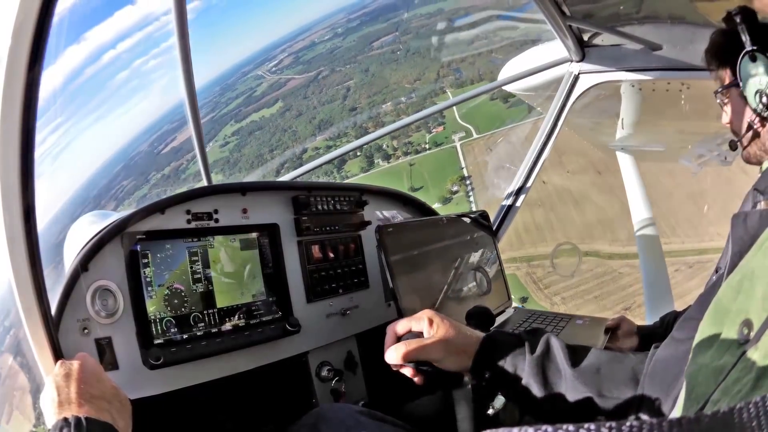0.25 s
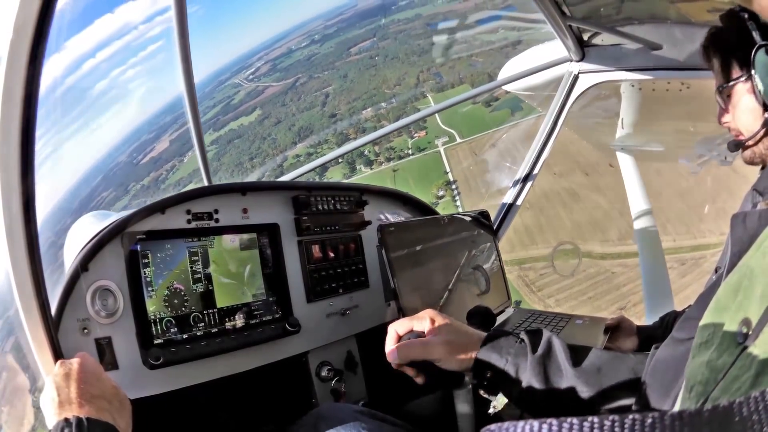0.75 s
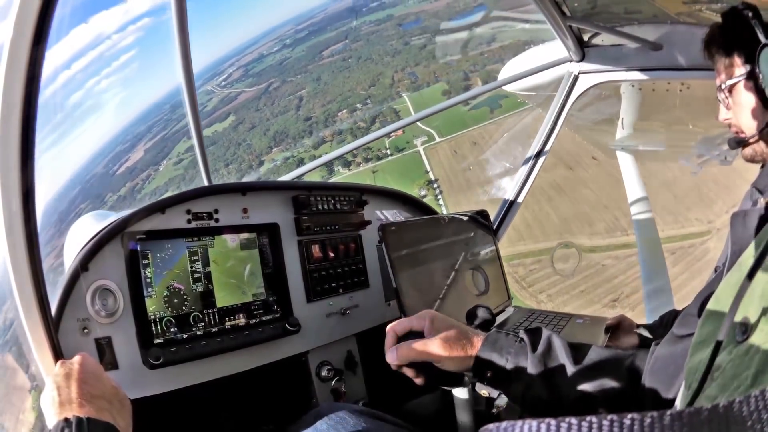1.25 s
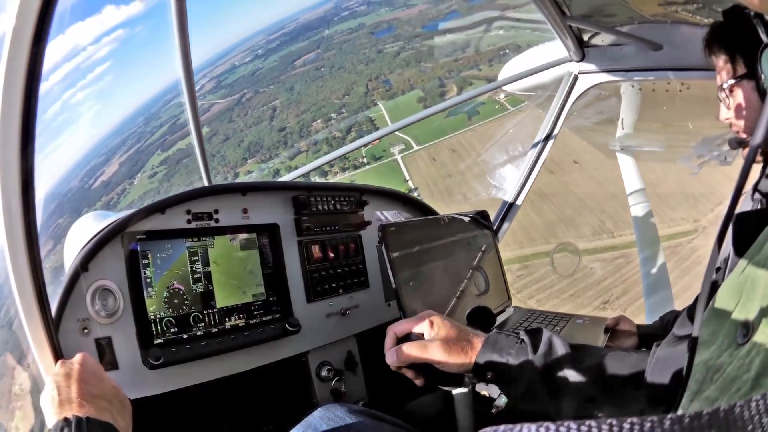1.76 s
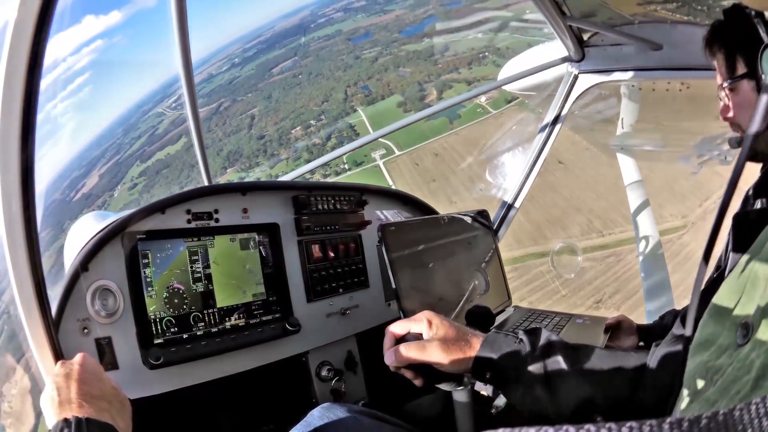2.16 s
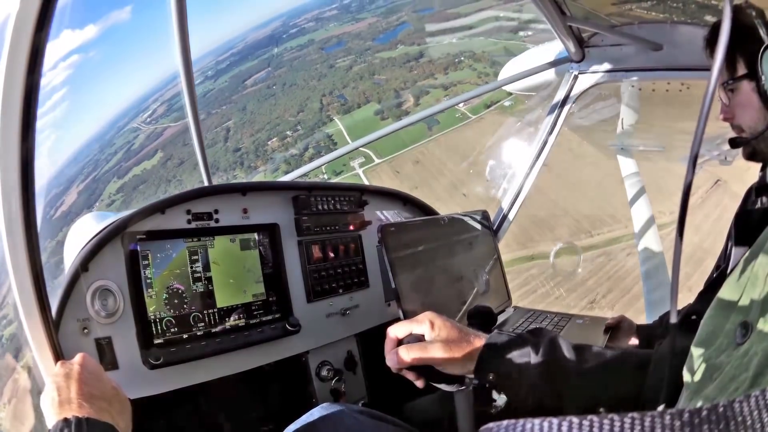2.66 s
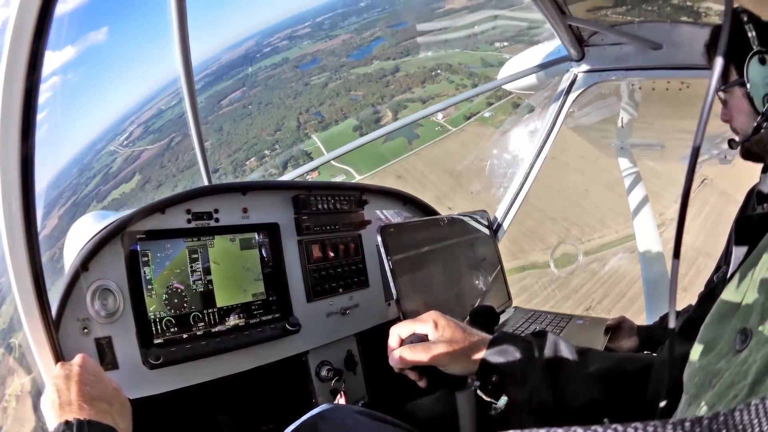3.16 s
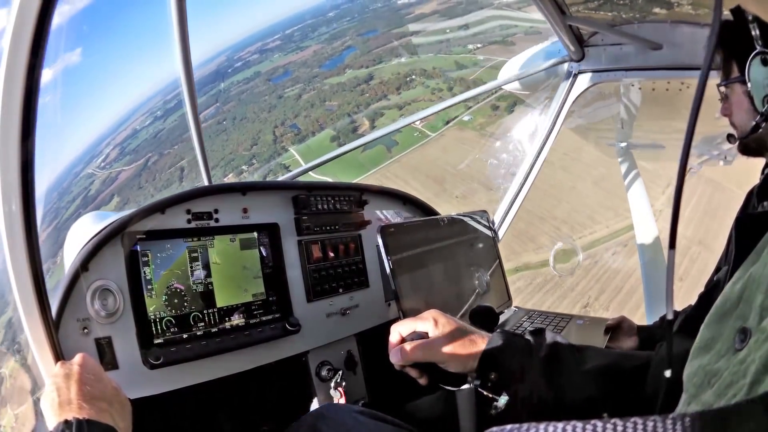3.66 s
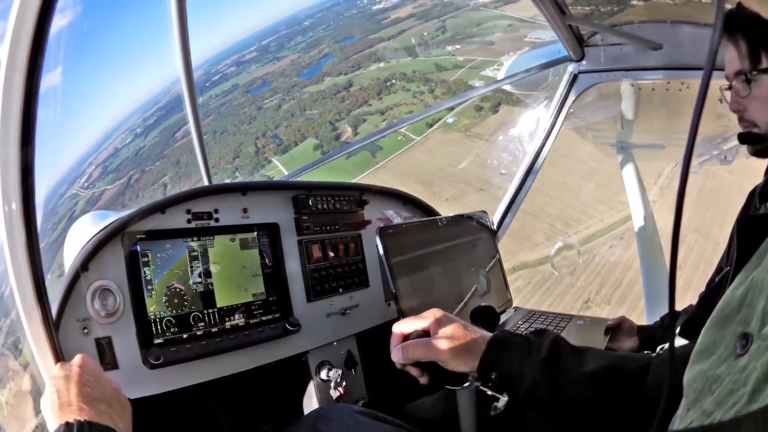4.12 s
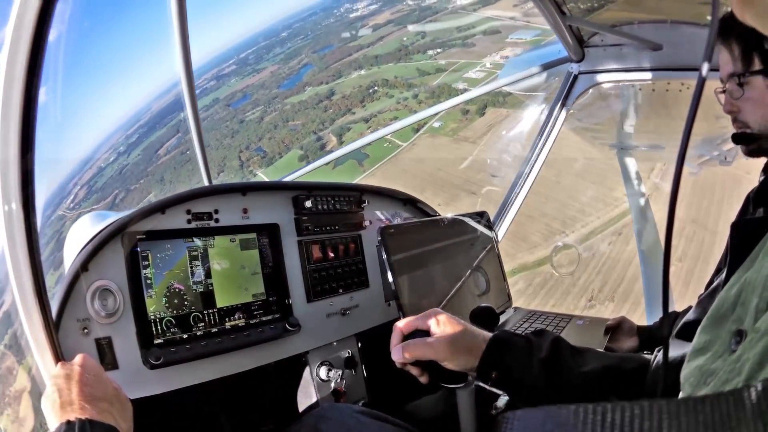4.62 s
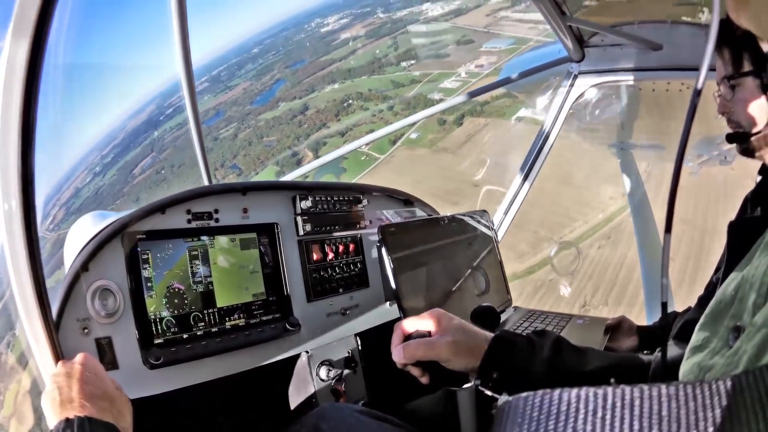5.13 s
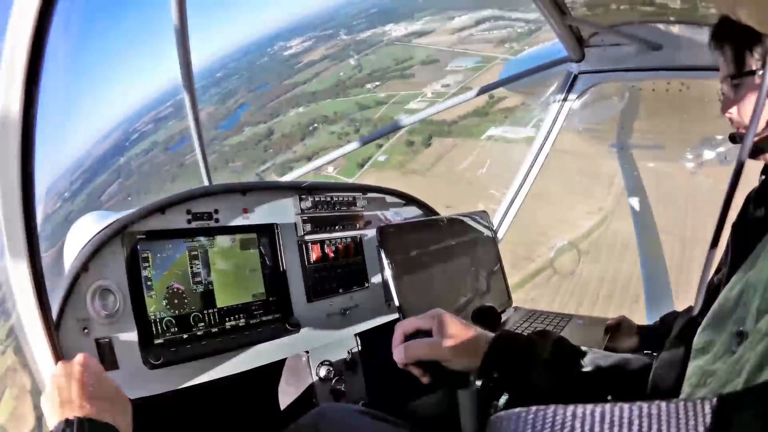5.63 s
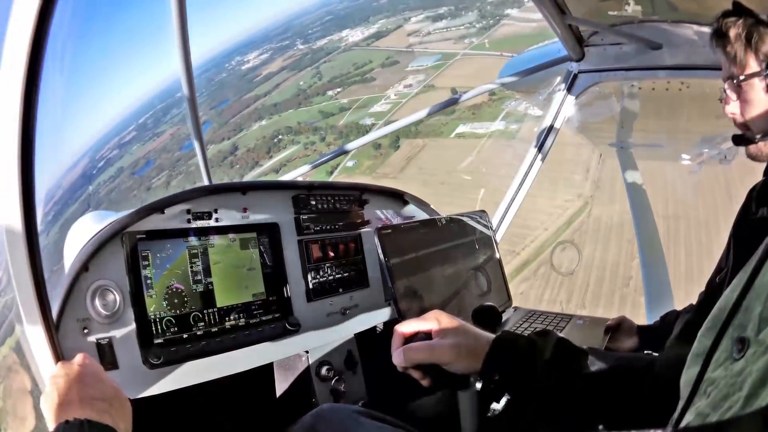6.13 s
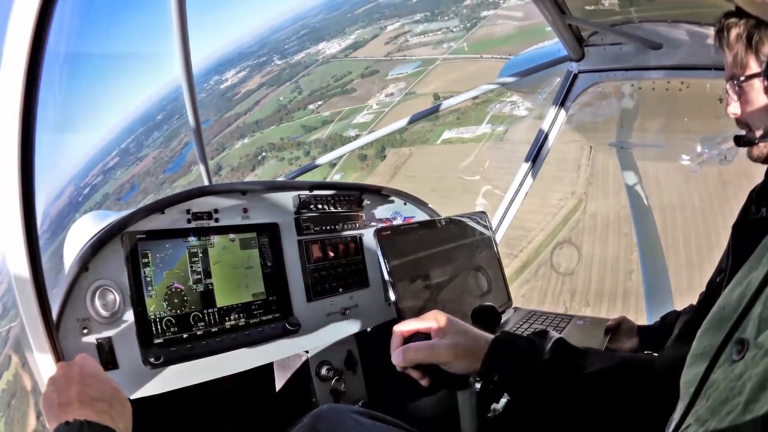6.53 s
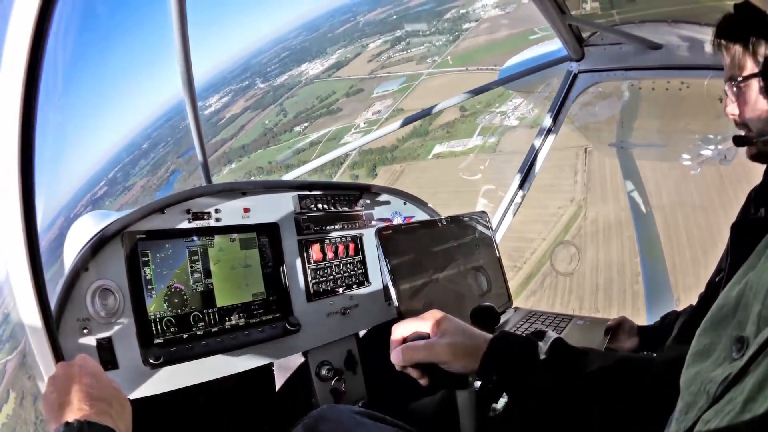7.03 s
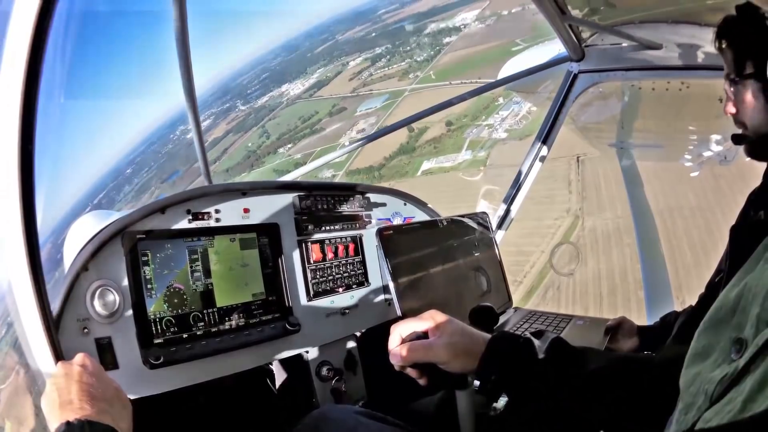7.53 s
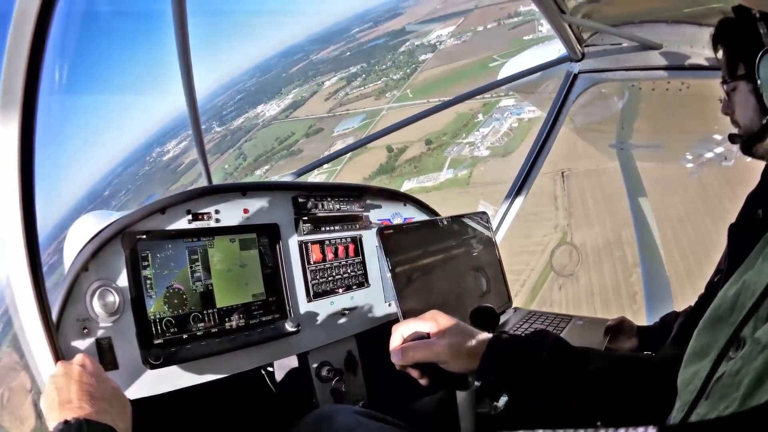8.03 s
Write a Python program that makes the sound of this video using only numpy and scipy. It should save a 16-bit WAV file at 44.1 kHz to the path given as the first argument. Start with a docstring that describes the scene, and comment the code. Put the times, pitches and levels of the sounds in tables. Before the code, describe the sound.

Heard from inside a light aircraft cabin, a four-cylinder engine and two-blade propeller hold a deep, buzzing drone throughout. Its tones slowly swell and sag, with rough exhaust flutter and muffled rushing air. Faint valve clatter and tiny rapid electrical ticks sit far below. Small gusts and low thumps come more in the second half, with a few soft knocks of loose fittings. The microphone is close inside the cockpit.

```python
"""A steady, slowly swelling drone fills the cabin of a light aircraft in cruise, with rushing air around it.
A four-cylinder engine turns a two-blade propeller at about 2260 rpm: blade passes and firings make the drone,
as tones locked to the engine. Exhaust puffs are bursts of noise, and the valve gear clatters faintly.
Each spark puts a tiny tick into the microphone lead. Air noise rushes over the canopy and briefly swells
around one pitch now and then, and loose fittings knock softly."""
import sys
import numpy as np
from scipy import signal
from scipy.fft import rfft, irfft
from scipy.io import wavfile

SR = 44100
rng = np.random.default_rng(int(sys.argv[2]) if len(sys.argv) > 2 else 0)


def unload_audio(sound):
    """Save the sound as a 16-bit wav file, at the path given as the first command line argument."""
    columns = np.transpose(np.atleast_2d(sound))
    # keep every value between -1 and 1, then stretch to whole-number steps
    steps = np.round(np.clip(columns, -1, 1) * 32767)
    wavfile.write(sys.argv[1], SR, steps.astype(np.int16))


N = 365148
TIME = np.arange(N) / SR  # s
FREQ = np.maximum(np.arange(N // 2 + 1) * SR / N, 1)  # Hz, kept above zero for the logarithm


def undb(db):
    """Turn decibels into a gain."""
    return 10 ** (np.asarray(db) / 20)


def level(x, db):
    """Set the average strength (rms) of a sound."""
    return x * undb(db) / np.sqrt(np.mean(x ** 2))


def curves(table):
    """Draw straight lines between the rows of a timed table, one curve for each column."""
    s, *columns = np.transpose(table)
    return [np.interp(TIME, s, column) for column in columns]


def colour(x, points):
    """Filter a sound by an outline of (frequency [Hz], gain [dB]) points."""
    hz, db = np.transpose(points)
    gain_db = np.interp(np.log(FREQ), np.log(hz), db)
    return irfft(rfft(x) * undb(gain_db), N)


def bell(hz, width_hz):
    """A bell-shaped curve over frequency, 1 at its centre."""
    return 1 / (1 + (2 * (FREQ - hz) / width_hz) ** 2)


def band(x, hz, width_hz):
    """Keep one bell-shaped band of a sound."""
    return irfft(rfft(x) * bell(hz, width_hz), N)


def walk(rate):
    """Slow chance wandering with an rms of 1, changing about rate times a second."""
    noise = rng.standard_normal(N)
    return level(irfft(rfft(noise) * np.exp(-(FREQ / rate) ** 2), N), 0)


def tone(turns, waver, rate):
    """A tone locked to the engine, wavering a little in size and phase."""
    wobble = 1 + waver * (walk(rate) + 1j * walk(rate))
    start = rng.random()
    return level(np.real(wobble * np.exp(2j * np.pi * (turns + start))), 0)


# Blade tones that slowly swell and sag: (time [s], tone at the firing rate [dB],
# at twice that rate [dB], at three times that rate [dB])
BLADE_TONES = [(0, -27.5, -25, -32.5), (0.4, -28, -23, -31.5), (0.95, -26, -29, -27.5),
               (1.7, -26, -29, -27.5), (2.1, -28, -24.5, -25), (2.6, -27, -23.5, -28),
               (3.5, -27.5, -27.5, -29), (4.15, -25.8, -26, -28.8), (4.45, -28, -24, -28.5),
               (4.75, -33.5, -26, -43), (5.1, -30.5, -34, -36), (5.45, -29, -27.5, -37),
               (5.7, -27.2, -21.5, -38), (6, -29.2, -24.1, -28.5), (6.5, -26.5, -26, -37),
               (6.9, -27.5, -26, -28), (7.3, -28.5, -23.5, -31.5), (7.55, -31, -28, -33),
               (7.95, -26.5, -33, -33), (8.28, -33, -26, -36)]
# Low beats of the unequal cylinders, trading strength as the load shifts:
# (time [s], 6th harmonic of the four-stroke cycle [dB], 14th harmonic [dB])
EXHAUST_BEATS = [(0, -38, -45), (0.35, -34, -40), (0.8, -46, -43), (1.3, -40, -37), (1.9, -47, -36),
                 (2.35, -38, -45), (3.2, -32, -41), (4.05, -33.5, -41), (4.45, -47, -38), (4.8, -48, -32),
                 (5.9, -46, -34), (6.3, -41, -46), (7.2, -35, -43), (7.85, -33.5, -37), (8.28, -42, -37)]
# Weaker tones of engine and drive: (harmonic of the four-stroke cycle [number], level [dB])
ENGINE_LINES = [(2, -45), (10, -42), (16, -43), (18, -47), (20, -47), (22, -40), (26, -47), (32, -51),
                (34, -46), (36, -47.5), (37, -41.5), (38, -47.5), (41, -47.5), (42, -54.5), (43, -59.5),
                (46, -58.5), (60, -60), (70, -63.5), (76, -64.5), (92, -63), (100, -66.5), (108, -67)]


def drone(firings):
    """Blade tones sit over harmonics of the four-stroke cycle; the higher of its fixed-level lines waver more."""
    cycles = firings / 4  # each of the four cylinders fires once per cycle
    blades = sum(undb(db) * tone(k * firings, waver=0.015, rate=3.4)
                 for k, db in enumerate(curves(BLADE_TONES), 1))
    beat_turns = 6 * cycles, 14 * cycles
    beats = sum(undb(db) * tone(turns, waver=0.14, rate=1.7)
                for turns, db in zip(beat_turns, curves(EXHAUST_BEATS)))
    lines = sum(undb(db) * tone(round(k) * cycles, waver=0.025 + 0.008 * k, rate=1.7)
                for k, db in ENGINE_LINES)
    return blades + beats + lines


# What the cabin shell lets through: (frequency [Hz], gain [dB])
SHELL_OUTLINE = [(20, -44), (38, -21.5), (55, -16), (85, -4), (200, -0.9), (350, -5.5), (520, -7),
                 (650, -13), (1000, -23), (1600, -33), (2500, -39.5), (4150, -45.5), (4650, -52),
                 (5150, -57), (7000, -70), (11000, -86)]
# Resonances of cabin air and panels; a minus is a dip: (frequency [Hz], width [Hz], lift [dB])
PANEL_RESONANCES = [(113, 25, 1.3), (207, 25, 2.06), (243, 26, -1), (367, 25, -4), (408, 15, 1.5),
                    (466.6, 50, 3.5), (572, 22, 3.5), (598, 26, -3), (1110, 150, 4), (1387, 110, 4),
                    (2980, 90, 3.5), (3540, 660, 2.5), (4450, 450, 0.5)]


def cabin(x):
    """The shell dulls what comes from outside, and its air and panels favour some bands and weaken others."""
    lift_db = sum(db * bell(hz, width_hz) for hz, width_hz, db in PANEL_RESONANCES)
    return colour(irfft(rfft(x) * undb(lift_db), N), SHELL_OUTLINE)


# The four cylinders in firing order: (spark timing offset [ms], strength of the exhaust puff [dB])
CYLINDER_TRAITS = [(-0.024, 0), (0.12, -1.5), (0.047, -0.5), (-0.075, -0.5)]


def exhaust(firings, buffet_db):
    """Each firing lets out a turbulent puff that shakes the cabin; the cylinders differ in strength."""
    cylinder = firings.astype(int) % len(CYLINDER_TRAITS)
    strength_db = np.transpose(CYLINDER_TRAITS)[1][cylinder]
    fading = np.exp(-(firings % 1) / 0.47)  # 0.47 of the time between firings
    puffs = undb(strength_db) * fading * rng.standard_normal(N)
    return level(cabin(puffs), -28) * undb(buffet_db)


def clatter(firings):
    """Valves and gears repeat the same rough noise pattern on every crank turn."""
    turn = rng.standard_normal(1024)
    place = np.arange(len(turn)) / len(turn)
    pattern = np.interp(firings / 2, place, turn, period=1)  # two firings per crank turn
    return level(band(pattern, hz=2130, width_hz=2500), -57.5) * undb(1.5 * walk(11.0))


def spark_pulses(firings, scatter_db, jitter_s):
    """One very short pulse per firing; each cylinder sparks a hair early or late."""
    lag_s = 0.0012  # shared by all cylinders
    count = np.arange(1, int(firings[-1]))
    late_s = np.resize(np.transpose(CYLINDER_TRAITS)[0], len(count)) / 1000
    late_s = late_s + lag_s + jitter_s * rng.standard_normal(len(count))
    at = np.interp(count, firings, np.arange(N)) + late_s * SR
    # a smooth 16-sample shape lets a pulse fall between two samples
    taps = at.astype(int)[:, None] + np.arange(-7, 9)
    offset = taps - at[:, None]
    shape = np.sinc(offset) * np.cos(np.pi * offset / 16) ** 2
    size = undb(scatter_db * rng.standard_normal((len(at), 1)))
    return np.bincount(np.clip(taps, 0, N - 1).ravel(), (shape * size).ravel(), N)


# Tone colour of the spark tick: (frequency [Hz], gain [dB])
SPARK_OUTLINE = [(200, -10), (1500, -1), (3400, -1.5), (5000, -8), (7000, -16), (9000, -23.5), (11500, -32)]
# How strongly the microphone lead picks up the sparks: (time [s], level [dB])
LEAD_PICKUP = [(0, -56.8), (2.8, -57.2), (4.5, -58.6), (5.9, -57.6), (6.1, -60), (6.6, -61.8), (7.1, -60.2),
               (7.7, -60.8), (8.05, -58.6)]


def ignition(firings):
    """Sparks are picked up electrically, so the ticks are sharp and skip the cabin's resonances."""
    pickup_db, = curves(LEAD_PICKUP)
    ticks = spark_pulses(firings, scatter_db=0.3, jitter_s=.00003)
    return level(colour(ticks, SPARK_OUTLINE), 0) * undb(pickup_db)


# How strongly each part of the air noise follows the gusts (dB per dB); exhaust shares the first
BUFFET_SHARE, ROAR_SHARE, HISS_SHARE = 0.2, 1.3, 0.6


def airflow(firings, gust_db):
    """Low buffeting, a fluttering roar and a hiss at the seals throb with the propeller's turn."""
    flow = level(cabin(rng.standard_normal(N)), -21.5)
    low, mid = (irfft(rfft(flow) / (1 + (FREQ / hz) ** 4), N) for hz in (450, 1600))
    propeller_turn = np.cos(np.pi * firings)  # two blade passes per turn
    flutter_db = 0.78 * walk(14)
    buffet_db = BUFFET_SHARE * gust_db + 0.6 * walk(12) + 0.79 * walk(28)
    buffet = low * undb(buffet_db) * (1 + 0.14 * propeller_turn)
    roar = (mid - low) * undb(ROAR_SHARE * gust_db + flutter_db + 1.2 * walk(38))
    hiss = (flow - mid) * undb(HISS_SHARE * gust_db + flutter_db + 0.92 * walk(20))
    return buffet + (roar + hiss) * (1 + 0.055 * propeller_turn)


# Brief swells of the air noise, some chance surges, some low thumps:
# (time [s], centre [Hz], half length [s], peak [dB])
AIR_SWELLS = [(1.338, 240, .01, -13.5), (2.312, 600, .008, -16), (3.548, 600, .008, -16),
              (4.175, 180, .014, -16), (5.561, 270, 0.011, -14), (5.711, 190, .012, -13),
              (5.757, 68.1, .05, -23), (6.522, 70.6, .035, -22.5), (7.567, 72.1, 0.054, -18.5),
              (7.874, 480, .025, -16), (7.95, 100, .09, -19)]


def air_swells():
    """Brief swells of the air noise around one pitch; some are chance surges, some low thumps."""
    out = np.zeros(N)
    for s, hz, half_s, db in AIR_SWELLS:
        surge = np.exp(-((TIME - s) / half_s) ** 2) * rng.standard_normal(N)
        width_hz = 0.98 * hz
        narrowed = band(band(surge, hz, width_hz), hz, width_hz)
        swell = colour(narrowed, SHELL_OUTLINE)
        out += undb(db) * swell / np.abs(swell).max()
    return out


# Small knocks of loose fittings: (time [s], ring [Hz], peak before the final low-pass [dB])
FITTING_KNOCKS = [(2.349, 3500, -36), (4.95, 3300, -37.5), (5.266, 3300, -38.5), (5.449, 3300, -37),
                  (5.475, 3100, -37.5), (5.555, 3200, -38.5), (6.608, 3200, -38), (7.743, 3050, -35),
                  (8.108, 3580, -32)]
# What such a part rings with: (multiple of its ring frequency [ratio], level [dB], decay [s])
RING_MODES = [(0.47, -9, .0025), (0.66, -7, .002), (0.91, -4, .002), (1, 0, .0025), (1.11, -4, .002),
              (1.22, -9, .0018)]


def fittings():
    """Loose parts tap softly in the vibration and ring dully for a few milliseconds."""
    attack_s, top_hz = 0.0005, 4900
    out = np.zeros(N)
    for s, hz, db in FITTING_KNOCKS:
        age = np.maximum(TIME - s, 0)
        ring = sum(undb(mode_db) * np.exp(-age / decay_s) * np.sin(2 * np.pi * ratio * hz * age)
                   for ratio, mode_db, decay_s in RING_MODES)
        ring = ring * (1 - np.exp(-age / attack_s))
        out += undb(db) * ring / np.abs(ring).max()
    return signal.sosfilt(signal.butter(6, top_hz, fs=SR, output="sos"), out)


# Engine speed; the blades pass at the same rate: (time [s], firing rate [Hz])
FIRING_RATE = [(0, 75.1), (1, 74.87), (1.5, 74.95), (2.25, 74.88), (3.15, 75.38), (3.55, 75.32), (4, 75.12),
               (4.3, 75.25), (4.7, 75.97), (5.1, 76.05), (6.2, 75.93), (6.65, 75.55), (6.95, 75.95),
               (7.7, 75.83), (8.28, 76.03)]
# Roughness of the air, with two bumpy spells and a calm between: (time [s], rise of the roughness [dB])
AIR_ROUGHNESS = [(0, -0.5), (0.55, 0.3), (1.3, 0), (1.6, 0.9), (2.45, -0.2), (3, 0.1), (3.25, -0.5),
                 (3.65, 0.5), (4.1, -1), (4.75, 1.1), (5.25, 1.3), (5.62, 1.6), (5.95, -1.5), (6.5, -0.5),
                 (6.8, -1.1), (7.25, -1.4), (7.6, 0.5), (7.9, 1.6), (8.28, 0.5)]


def scene():
    """Engine sounds follow the count of firings; air and exhaust also follow roughness and chance gusts."""
    firing_hz, = curves(FIRING_RATE)
    firings = np.cumsum(firing_hz) / SR
    roughness_db, = curves(AIR_ROUGHNESS)
    gust_db = roughness_db + 0.3 * walk(2.2)  # spread in dB, changes per second
    engine = drone(firings) + exhaust(firings, BUFFET_SHARE * gust_db)
    engine = engine + clatter(firings) + ignition(firings)
    return (engine + airflow(firings, gust_db) + air_swells() + fittings())[None]


def record(dry):
    """Fade both ends over 2 ms, then cut the top steeply above 12.3 kHz."""
    fade = np.minimum(np.minimum(TIME, TIME[::-1]) / .002, 1)
    top_cut = signal.ellip(8, .2, 70, 12300, fs=SR, output="sos")  # ripple 0.2 dB, stop 70 dB
    return signal.sosfilt(top_cut, dry * fade)


dry = scene()
out = record(dry)
unload_audio(out)
```